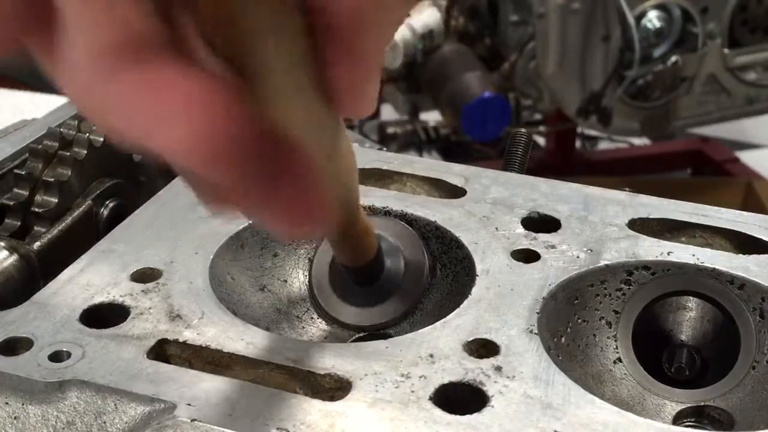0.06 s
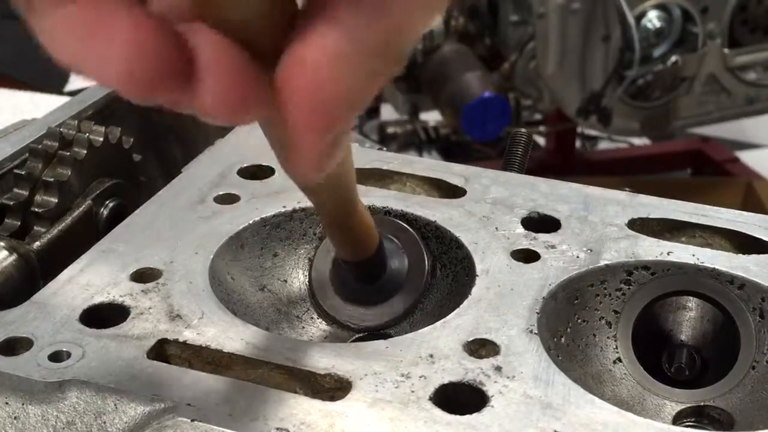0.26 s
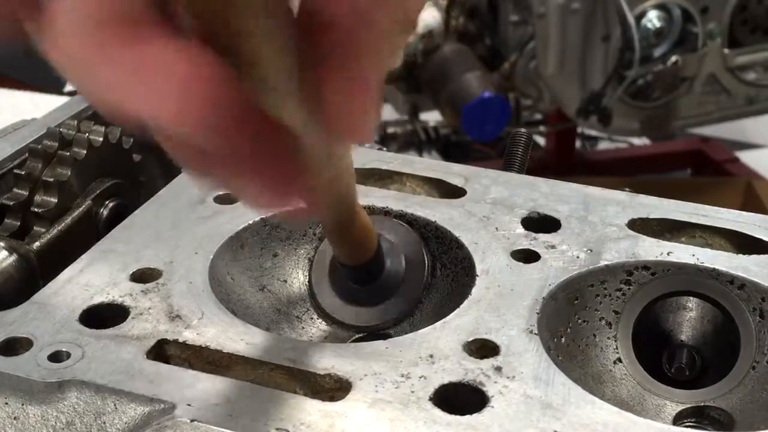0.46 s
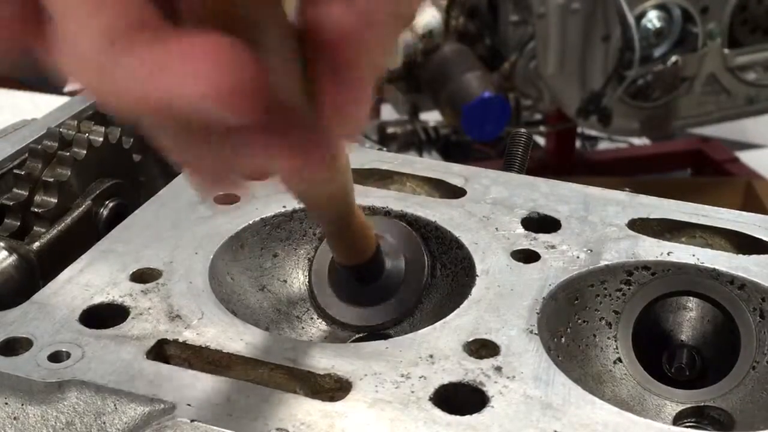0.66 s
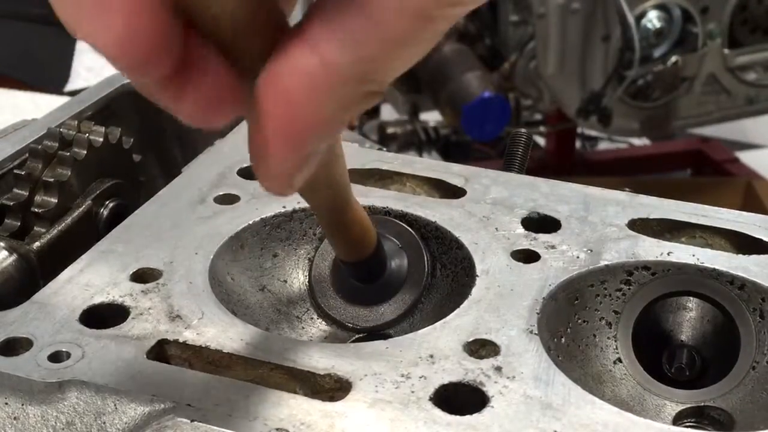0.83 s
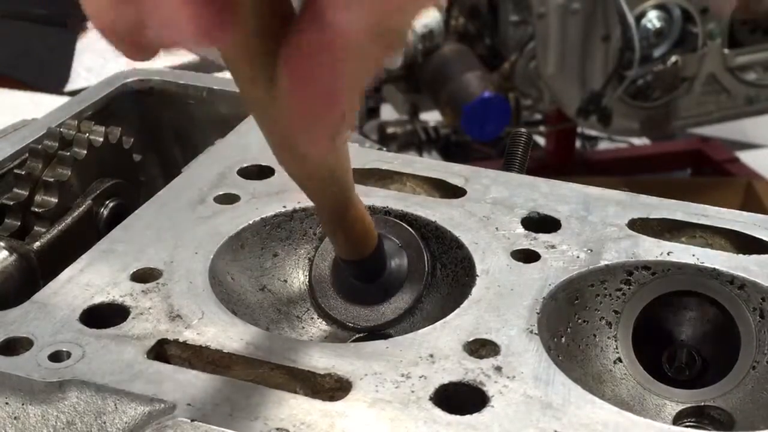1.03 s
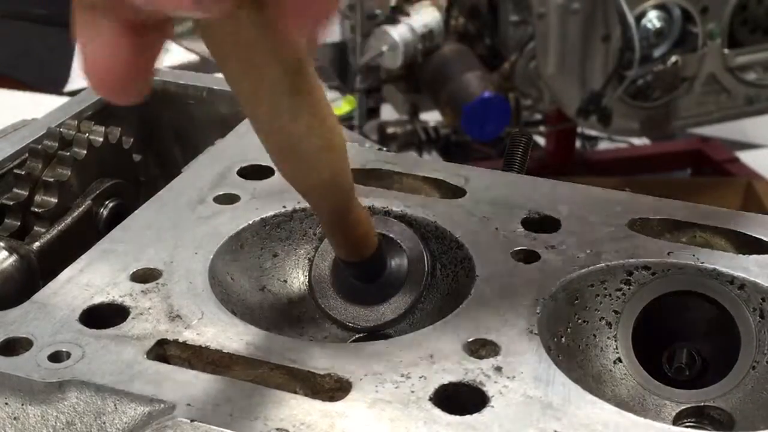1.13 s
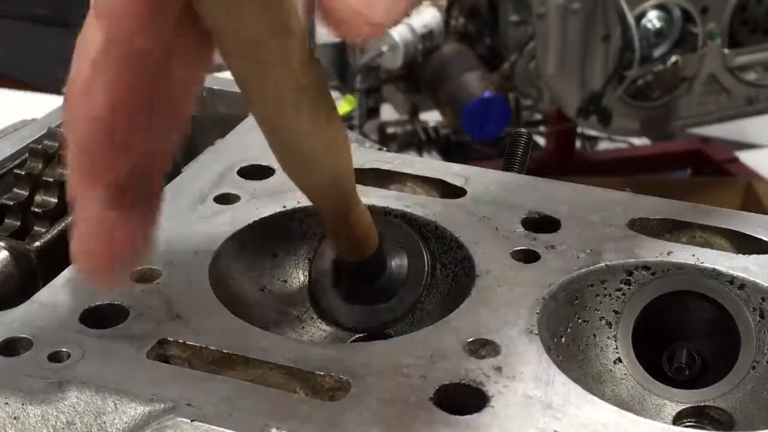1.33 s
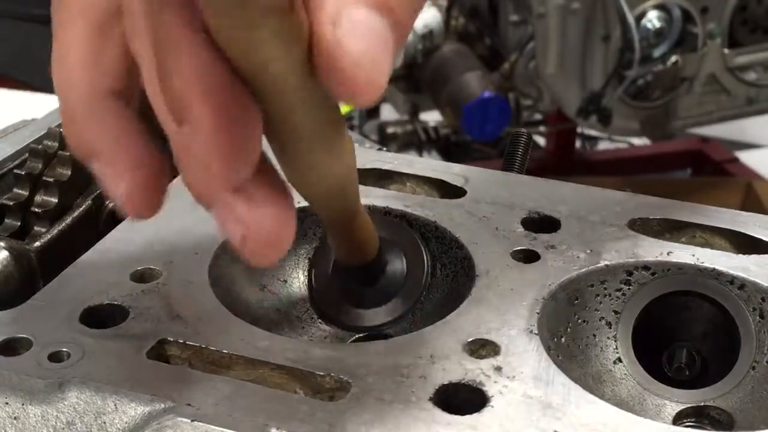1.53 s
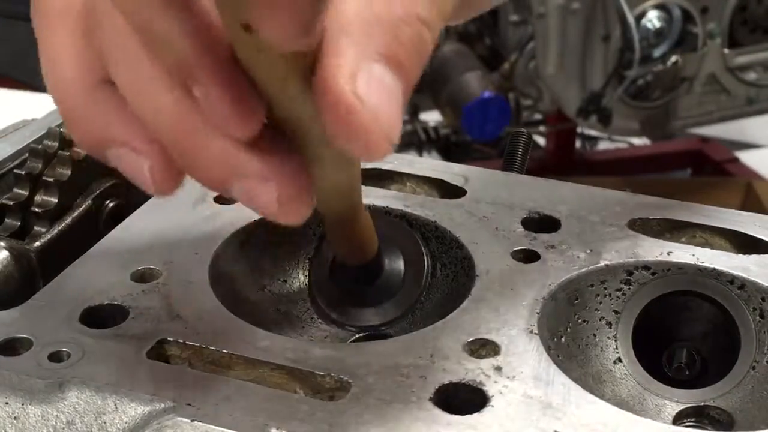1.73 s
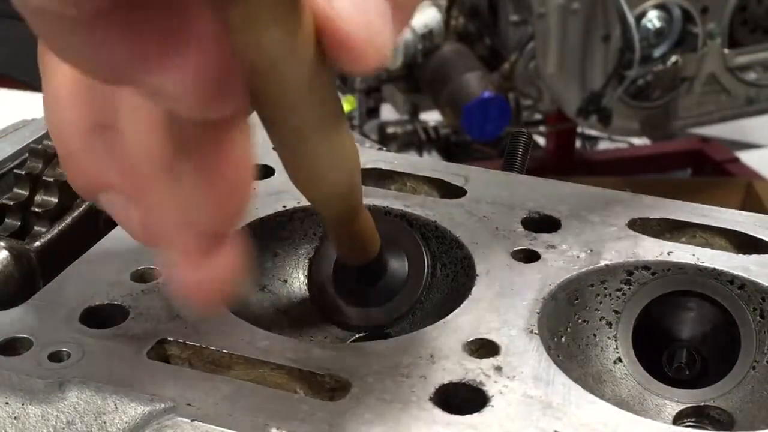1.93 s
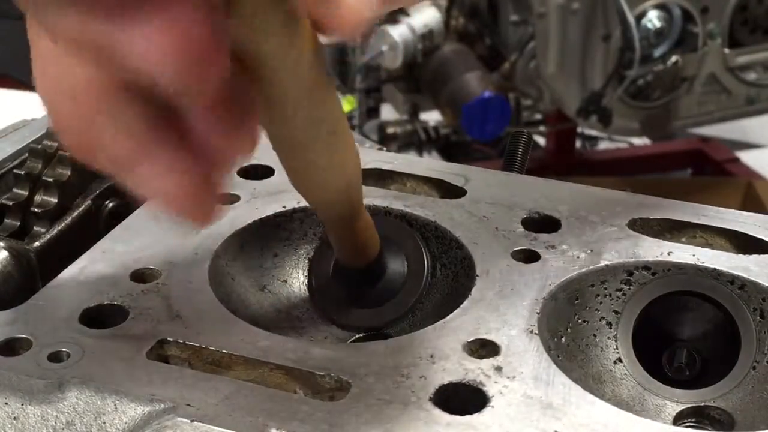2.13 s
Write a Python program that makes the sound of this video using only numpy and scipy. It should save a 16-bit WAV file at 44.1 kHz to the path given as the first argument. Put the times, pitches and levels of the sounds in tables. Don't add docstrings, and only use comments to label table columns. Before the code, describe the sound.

Gritty metallic rasping as a valve on a wooden stick is twisted to and fro in quick uneven strokes, pausing to quiet workshop hum, then resuming; heard close on a phone in a small-sounding room.

```python
import sys
import numpy as np
from scipy import signal
from scipy.fft import rfft, irfft
from scipy.io import wavfile
from scipy.ndimage import uniform_filter1d

SR = 44100
rng = np.random.default_rng(int(sys.argv[2]) if len(sys.argv) > 2 else 0)


def rack_gain(trim_db):
    fader = np.asarray(trim_db, float)
    return 10 ** (fader / 20)


def transcribe(signal):
    frames = np.atleast_2d(signal).T
    limited = np.clip(frames, -1, 1)
    pcm = np.round(limited * 32767).astype(np.int16)
    wavfile.write(sys.argv[1], SR, pcm)


N = 96182

# [f/Hz, level/dB per Hz]
SHOP_SPECTRUM = [(60, -6.5), (86, -23.5), (120, -10.5), (205, -7), (270, -21), (600, -26), (1600, -35),
                 (15900, -47)]
# [t/s, level/dB, f/Hz, length/s]
TICKS = [
    (1.091, -55.5, 2630, 0.0015),
    (1.26, -56, 1900, 0.0012),
    (1.411, -57, 2420, 0.0016),
    (1.14, -70.5, 9000, 0.026),
    (1.246, -72, 13000, 0.02),
    (1.257, -72, 7500, 0.017),
    (1.346, -74, 13300, 0.015),
]
# [t/s, length/s, level/dB, sag over the twist/dB, treble/dB]
TWISTS = [(-.03, 0.048, -38.5, -7.5, 4), (0.069, 0.151, -30.5, -2.5, 2), (0.21, 0.064, -34, -4.5, -2),
          (0.297, 0.018, -52.5, 9, 4), (0.319, 0.11, -26.5, -12.5, 2.5), (0.435, 0.023, -35.5, -2, 3.5),
          (0.523, 0.16, -29.5, -2.5, -2.5), (0.694, 0.041, -35.5, -4.5, -1.5), (0.779, .15, -31, -6.5, 0),
          (0.941, 0.12, -46.5, -18.5, -2), (1.076, 0.046, -54, -17, -12), (1.472, 0.011, -56, -2.5, 3),
          (1.489, 0.0086, -44.5, -1, 4.5), (1.504, .21, -31.5, 0, -1), (1.724, 0.018, -31, -7.5, 3),
          (1.753, 0.11, -30.5, -6, -1), (1.859, 0.012, -34.5, 1, -0.5), (1.915, 0.2, -30.5, -2, -1),
          (2.136, 0.014, -32.5, -5, 0)]
# [t/s, half width/s, level/dB]
SURGES = [(.15, 0.033, 0), (0.362, 0.014, 6), (0.628, 0.049, 6), (0.831, 0.023, 10), (1.607, 0.016, 7.5),
          (1.999, 0.018, 8), (0.401, .004, -9.5), (1.525, .004, -4.5), (1.663, 0.0029, -1),
          (1.695, 0.0055, -4.5), (2.025, 0.0043, -7), (.44, .004, -7), (.702, 0.0034, -8.5),
          (1.754, 0.0025, -8), (1.861, 0.0026, -3), (1.725, .004, -1)]
# [t/s, peak level/dB]
CRACKS = [(0.082, -28), (0.1336, -17), (0.2153, -19), (0.3284, -10.5), (0.3355, -19), (0.4436, -29),
          (0.5316, -37), (0.548, -20), (0.5608, -19), (0.586, -18), (0.6379, -20.5), (0.6837, -27),
          (0.6872, -34), (0.707, -17), (0.7845, -32), (0.826, -16), (0.8765, -30.5), (0.8951, -24.5),
          (0.9666, -47), (1.0951, -44), (1.51, -20.5), (1.616, -15), (1.7005, -46), (1.731, -32),
          (1.7667, -15.5), (1.9287, -21), (1.949, -15), (2.0352, -20.5), (2.0608, -15), (2.1433, -33.5)]
# [f/Hz, width/Hz, level/dB]
PORT_MODES = [(177, 29, -20), (470.3, 24, -19), (583.5, 57.6, -16.5), (974, 104, -10), (1075.4, 74, -15.5),
              (1101, 82, -2.5), (1190.2, 73.6, 0), (1336.5, 91.5, -10.5), (1622, 203, -21)]
VALVE_HZ = [1995, 2333, 2970, 3577, 4030, 4515, 5590, 5884, 6282, 6547, 7470, 11400, 11800, 15400]
# [width/Hz, level/dB]
VALVE_MODES = [(35.3, -3), (44, -5.5), (108, -15), (30.2, 0), (45, -16), (39.4, -5.5), (30, -5),
               (34.7, -15.5), (40.3, -12), (28.2, -11), (91, -13.5), (70, -12), (200, -13.5), (500, -14)]
# [f/Hz, level/dB per Hz]
RASP_SPECTRUM = [(330, -24.5), (600, -5), (1500, -5.5), (2600, -5), (7500, -8.5), (10300, -11.5),
                 (12000, -11.5), (15500, -18.5)]


def level(x, db):
    return x * rack_gain(db) / np.sqrt(np.mean(x ** 2))


def ring(x, hz, width_hz):
    b, a = signal.iirpeak(min(hz, 0.45 * SR), hz / width_hz, fs=SR)
    return signal.lfilter(b, a, x)


def colour(x, points):
    size = 8192
    hz, db = np.array(points, float).T
    bins_hz = np.arange(size // 2 + 1) * SR / size
    response_db = np.interp(np.log(bins_hz + 1), np.log(hz), db)
    cepstrum = irfft(np.log(rack_gain(response_db)))
    cepstrum[1:size // 2] *= 2
    cepstrum[size // 2 + 1:] = 0
    return signal.fftconvolve(x, irfft(np.exp(rfft(cepstrum))))[:N]


def walk(rate):
    k = int(SR / rate)
    held = np.repeat(rng.standard_normal(N)[:N // k + 1], k)
    return 1.76 * uniform_filter1d(uniform_filter1d(held, k), k)[:N]


def puff(start_s, rise_s):
    v = np.maximum(np.arange(N) / SR - start_s, 0) / rise_s
    return v * np.exp(1 - v)


def motor():
    hz = 59.9 * (1 + 0.028 * walk(3.2))
    return rack_gain(-60.5 + 2.7 * walk(13)) * np.sin(2 * np.pi * np.cumsum(hz) / SR)


def ticks():
    out = np.zeros(N)
    for s, db, hz, length in TICKS:
        out += rack_gain(db) * ring(rng.standard_normal(N) * puff(s, length), hz, hz / 2)
    return out


def shop():
    rumble = colour(rng.standard_normal(N), SHOP_SPECTRUM) * rack_gain(2 * walk(6.8))
    return level(rumble, -58) + motor() + ticks()


def room(near):
    t60_s, first_echo_s, dull_hz = 0.25, 0.006, 9000
    u = np.arange(SR // 2) / SR
    tail = rng.standard_normal(len(u)) * rack_gain(-60 * u / t60_s) * (u > first_echo_s)
    tail = signal.lfilter(*signal.butter(1, dull_hz, fs=SR), tail)
    return signal.fftconvolve(near, tail / np.linalg.norm(tail))[:N]


def twisting(attack_s, surge_share, treble_share):
    release_db_per_s = 894.5
    creep_db, creep_db_per_s = -10, 180
    t, power = np.arange(N) / SR, np.zeros(N)
    for s, length, db, sag_db, treble_db in TWISTS:
        u = t - s
        bite = np.clip(u / attack_s, 0, 1)
        held_db = db + treble_share * treble_db + sag_db * np.clip(u / length, 0, 1)
        after = np.maximum(u - length, 0)
        letting_go_db = np.maximum(-release_db_per_s * after, creep_db - creep_db_per_s * after)
        power += (bite * rack_gain(held_db + letting_go_db)) ** 2
    surge_db = sum(db * np.exp(-0.5 * ((t - s) / w) ** 2) for s, w, db in SURGES)
    return np.sqrt(power) * rack_gain(surge_share * surge_db)


def grit():
    grains_per_s, spread_db, top_db = 4000, 4, 7
    crushed = rng.random(N) < grains_per_s / SR
    size_db = np.minimum(spread_db * rng.exponential(size=N), top_db)
    powder = rng.standard_normal(N)
    return level(crushed * rack_gain(size_db) * np.sign(powder) + 0.97 * powder, 0)


def cracks():
    return sum(rack_gain(db - 4.5) * puff(s, 0.0024) for s, db in CRACKS)


def chatter(crack):
    hz = 1179.5
    return ring(crack * np.sin(2 * np.pi * hz * np.arange(N) / SR), hz, 250)


def port(x):
    return sum((-1) ** k * rack_gain(db) * ring(x, hz, w) for k, (hz, w, db) in enumerate(PORT_MODES))


def valve(x, patches):
    out = np.zeros(N)
    for hz, (width_hz, db), patch in zip(VALVE_HZ, VALVE_MODES, patches):
        out += rack_gain(db) * patch * ring(x * patch, hz, width_hz)
    return out


def casting(carried, direct):
    t60_s, share = 0.095, 0.54
    u = np.arange(SR // 8) / SR
    rings = rng.standard_normal(len(u)) * rack_gain(-60 * u / t60_s)
    through = signal.fftconvolve(carried, rings / np.linalg.norm(rings))[:N]
    return (1 - share) * direct + share * through


def lapping():
    judder, grains, fine, crack = rack_gain(walk(44.65)), grit(), grit(), cracks()
    low = twisting(0.0059, 0.26, 0) * judder

    def treble_force(surge_share):
        twist = twisting(0.0087, surge_share, 0.92) * np.sqrt(judder)
        return np.hypot(twist, crack * rack_gain(-12))

    high, air = treble_force(1), treble_force(0.84)
    air_split = signal.butter(2, 8500, fs=SR)

    def bright(x):
        hiss = x * air
        return signal.lfilter(*air_split, x * high) + hiss - signal.lfilter(*air_split, hiss)

    flutter = rack_gain(2.5 * walk(160))

    def rasp(x):
        return colour(bright(x * flutter), RASP_SPECTRUM) / np.std(colour(x, RASP_SPECTRUM))

    patches = [rack_gain(0.5 * walk(35)) for _ in VALVE_MODES]
    boom = port(grains * low) / np.std(port(grains))
    steel = valve(bright(fine), patches) / np.std(valve(fine, patches))
    scrape = casting(rasp(grains), rasp(grit()))
    return boom + chatter(crack) + rack_gain(-13.5) * scrape + rack_gain(-12.5) * steel


def scene():
    near = lapping()
    return (near + rack_gain(-15.5) * room(near) + shop())[None]


def roll_off(x):
    return signal.sosfilt(signal.butter(12, 16040, fs=SR, output="sos"), x)


def record(dry):
    bass_cut = signal.butter(4, 58, "high", fs=SR, output="sos")
    top_cut = signal.ellip(12, 0.2, 90, 15680, fs=SR, output="sos")
    x = signal.sosfilt(top_cut, signal.sosfilt(bass_cut, dry))
    return roll_off(x)


dry = scene()
out = record(dry)
transcribe(out)
```